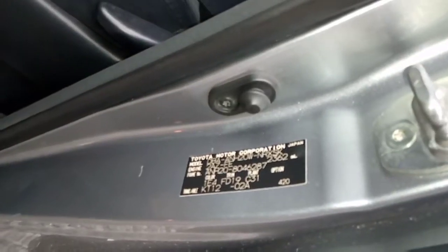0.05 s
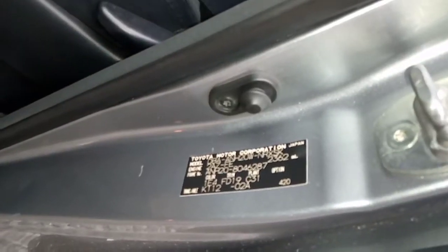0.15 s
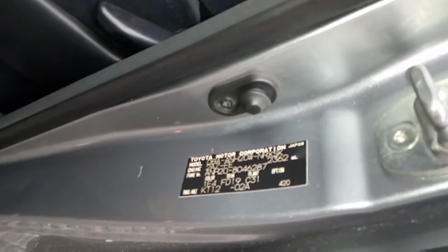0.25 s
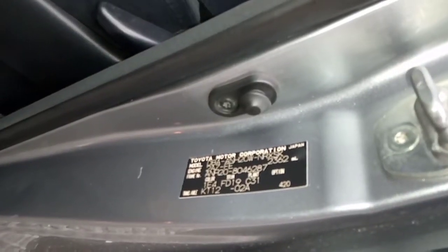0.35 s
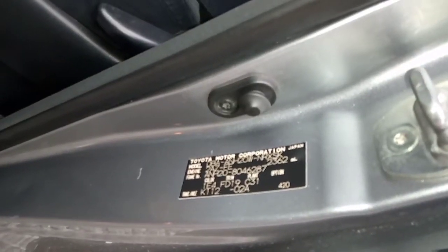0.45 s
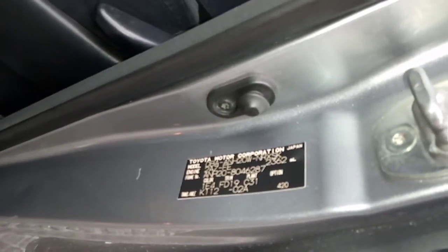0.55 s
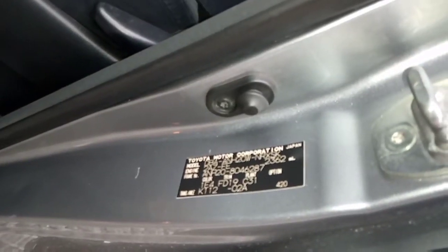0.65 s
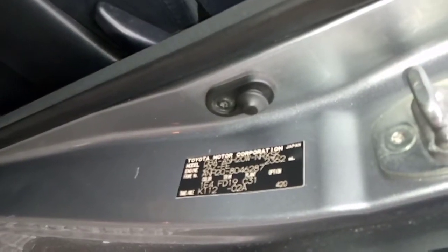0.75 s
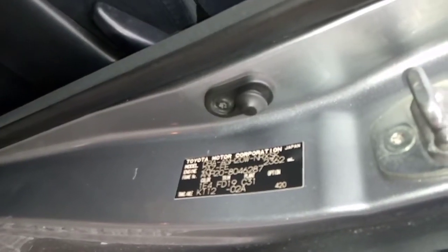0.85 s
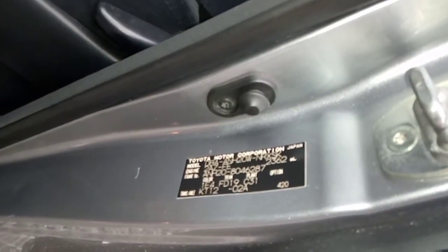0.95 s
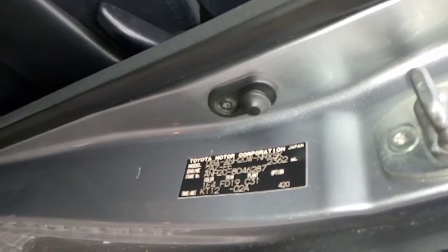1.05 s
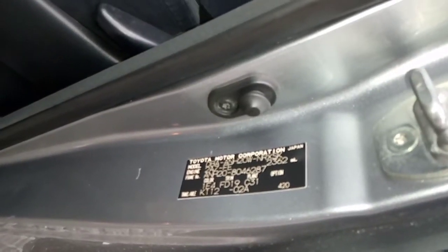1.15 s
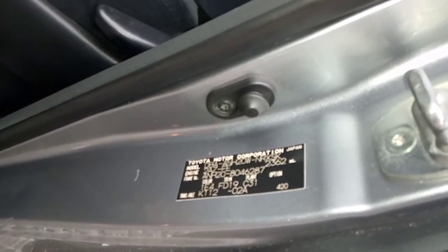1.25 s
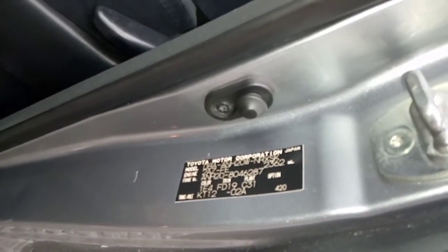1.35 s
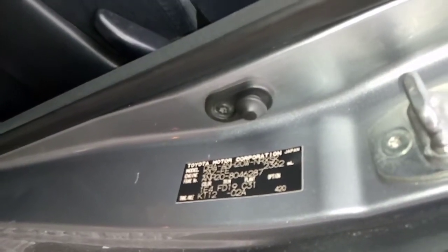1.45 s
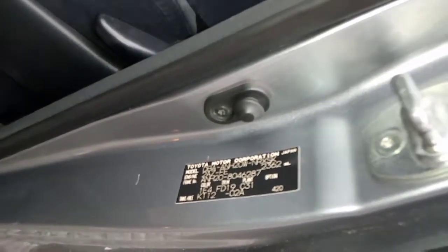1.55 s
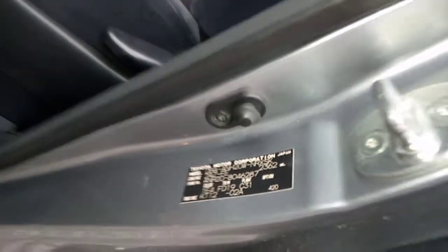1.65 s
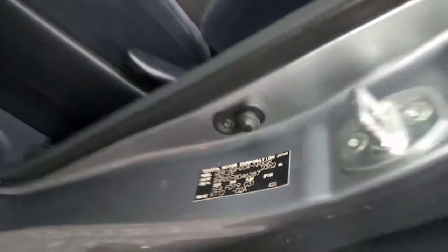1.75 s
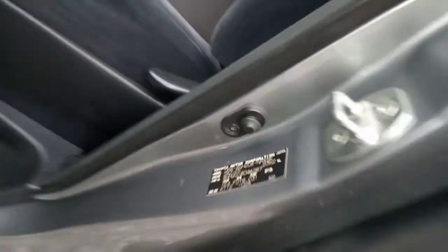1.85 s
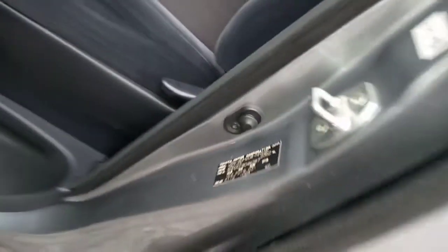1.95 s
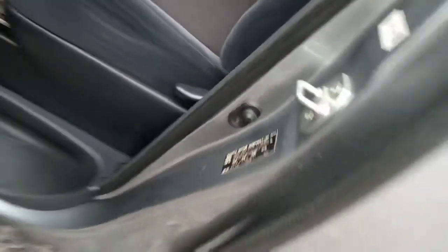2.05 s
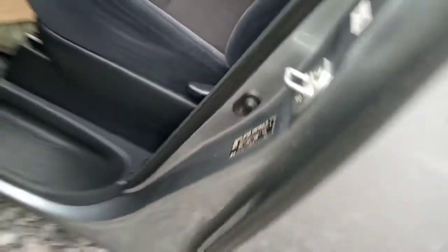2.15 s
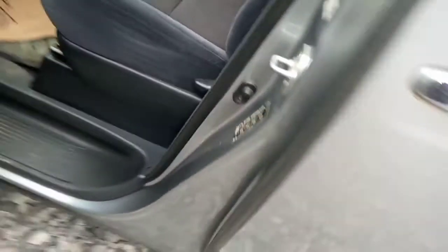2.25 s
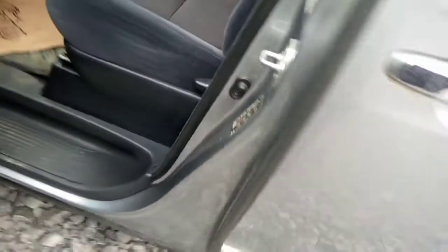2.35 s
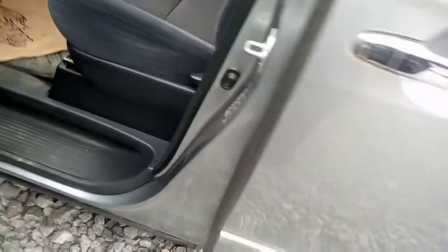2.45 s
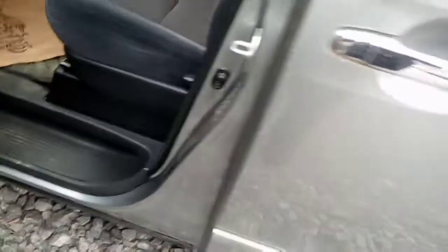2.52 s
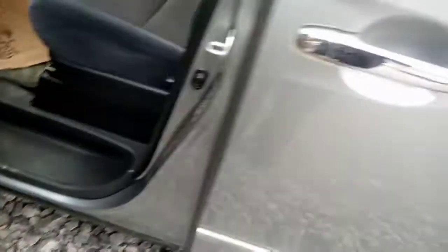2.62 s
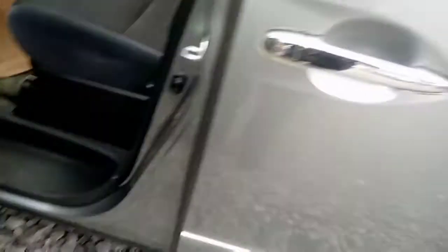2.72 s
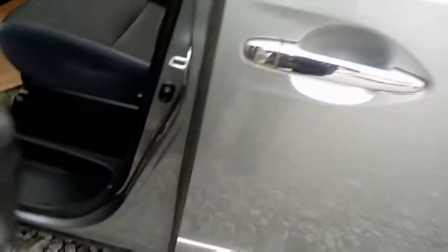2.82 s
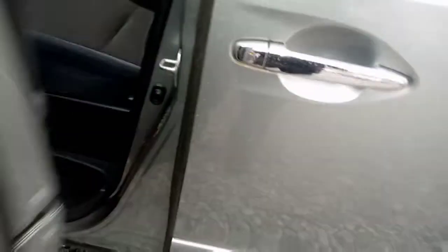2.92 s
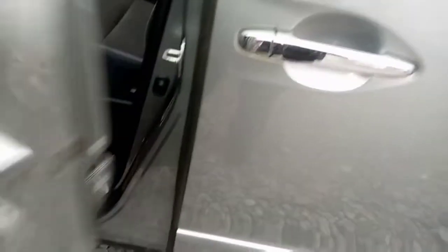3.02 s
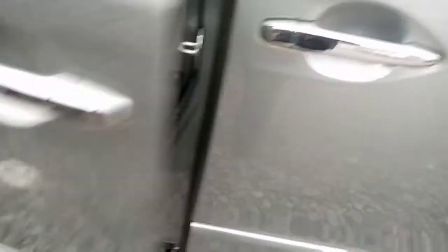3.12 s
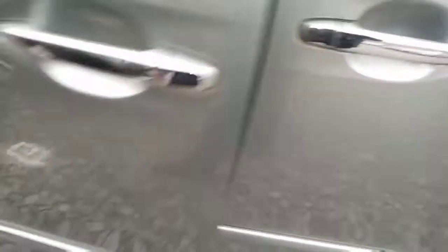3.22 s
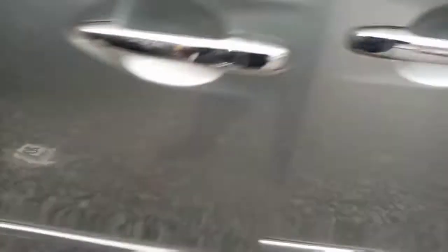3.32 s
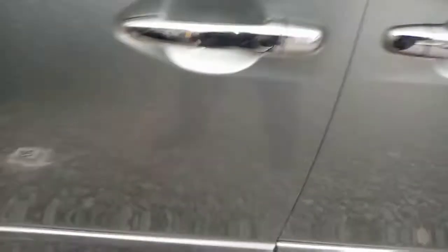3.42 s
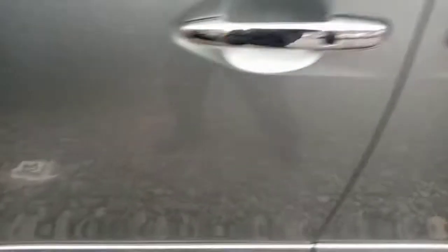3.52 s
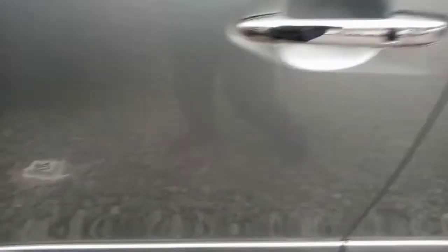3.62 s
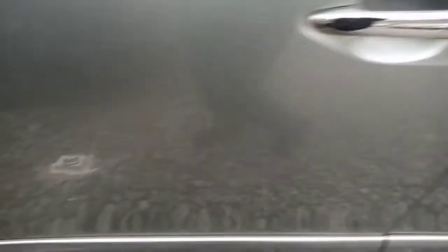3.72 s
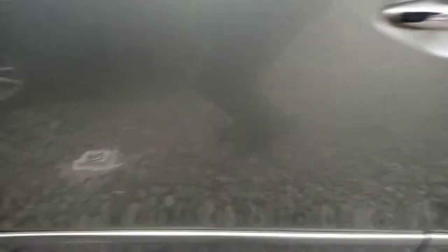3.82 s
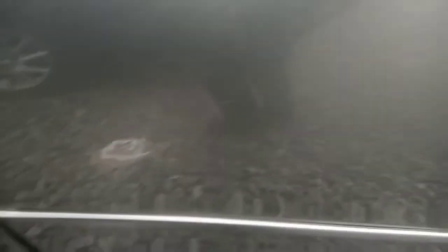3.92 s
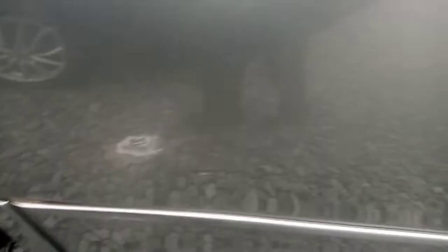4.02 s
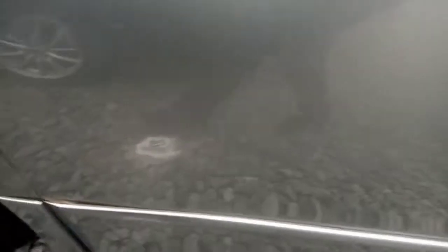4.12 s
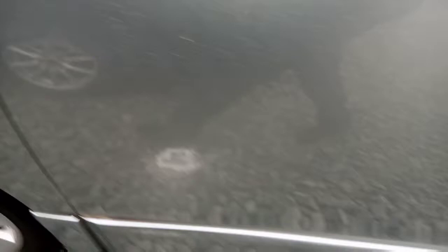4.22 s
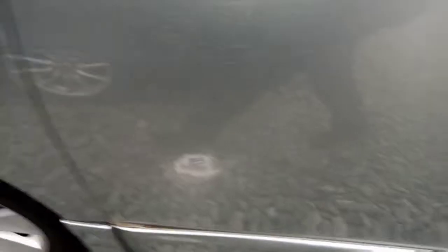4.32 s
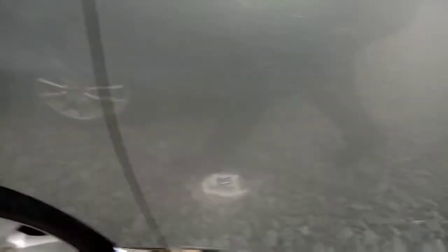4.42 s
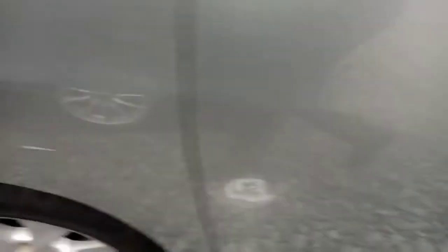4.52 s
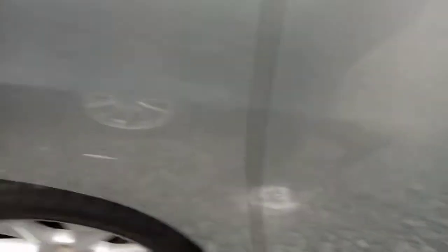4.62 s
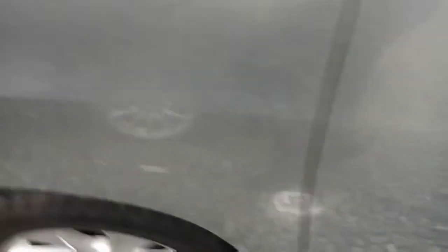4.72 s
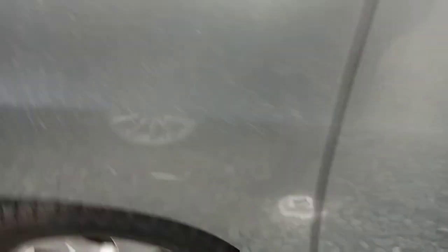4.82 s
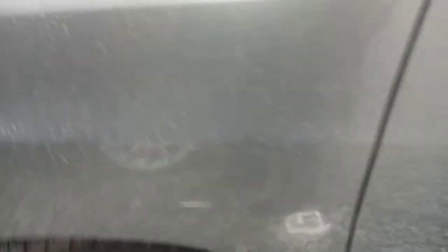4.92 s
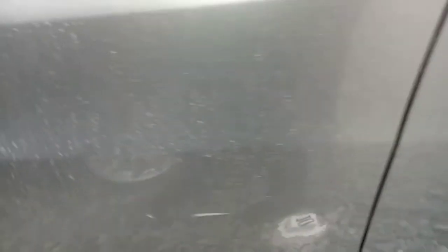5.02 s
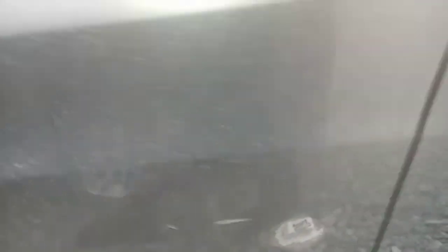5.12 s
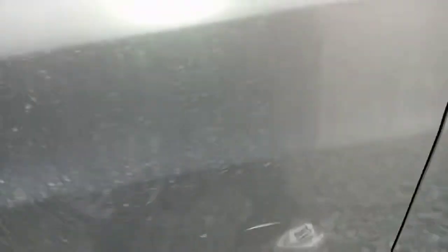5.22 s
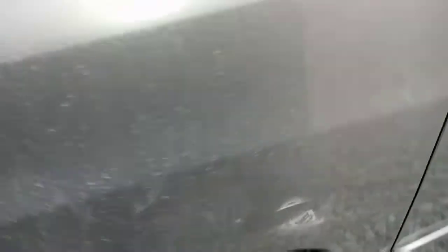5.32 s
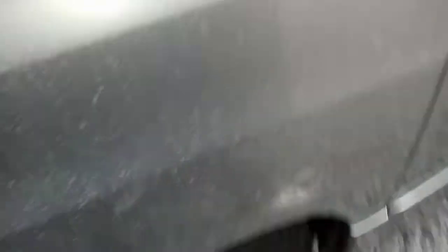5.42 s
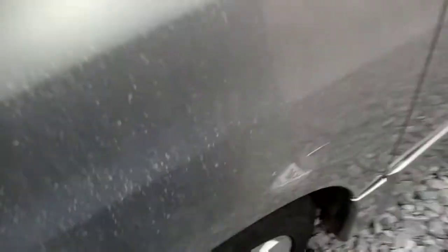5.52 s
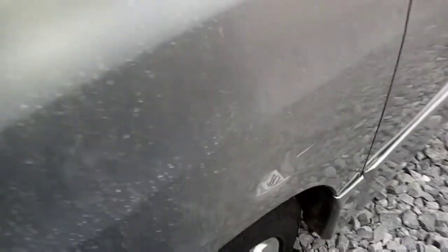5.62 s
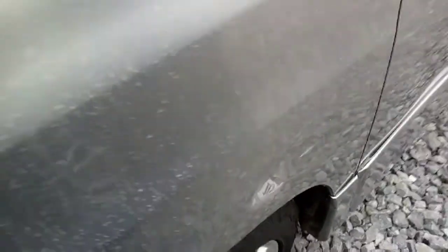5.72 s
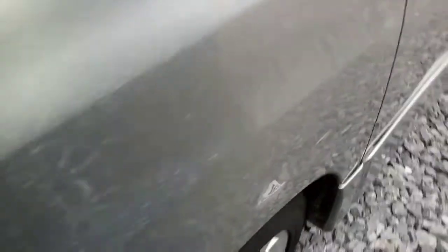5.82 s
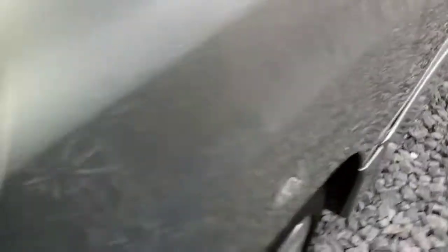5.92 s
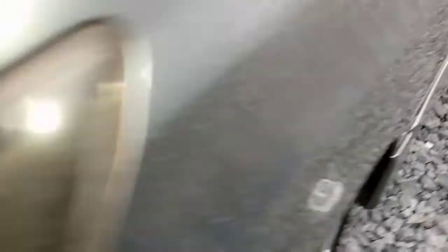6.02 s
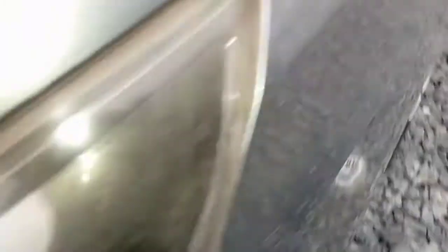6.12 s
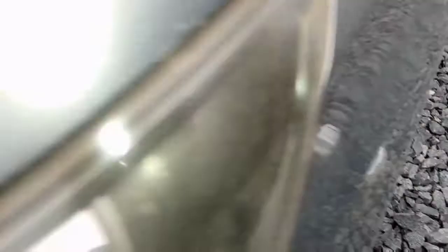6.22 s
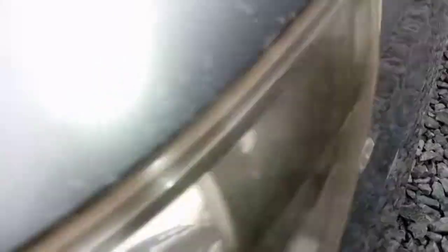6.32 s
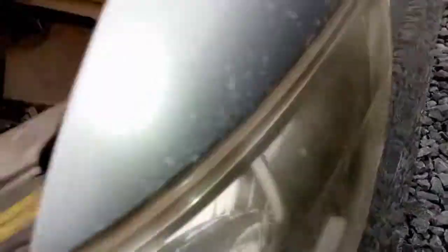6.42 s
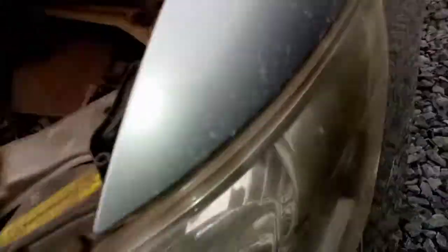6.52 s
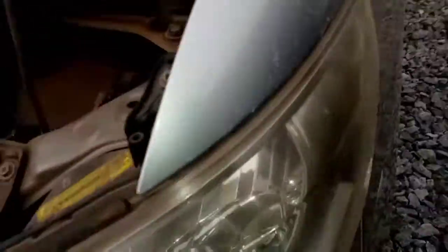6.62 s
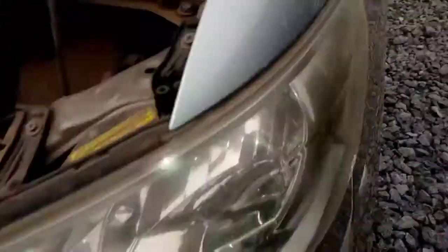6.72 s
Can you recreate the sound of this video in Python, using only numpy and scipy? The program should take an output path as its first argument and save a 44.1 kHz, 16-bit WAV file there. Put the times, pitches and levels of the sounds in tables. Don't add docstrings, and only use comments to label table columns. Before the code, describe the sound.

Faint, slightly robotic hum and hiss fill an open yard for a few seconds. Then one car door shuts near the microphone, a metallic latch tick running straight into a firm low-mid thump of panel, rubber seals and squeezed cabin air. Loose trim rattles briefly and the body settles softly. The quiet buzzing background continues to the end, nearly mono and dull in the highest treble.

```python
import sys
import numpy as np
from scipy import signal
from scipy.fft import rfft, irfft
from scipy.io import wavfile
from scipy.ndimage import uniform_filter1d

SR = 44100
rng = np.random.default_rng(int(sys.argv[2]) if len(sys.argv) > 2 else 0)


def file_out(sig):
    cols = np.atleast_2d(sig).T
    lim = np.clip(cols, -1, 1)
    pcm = np.round(lim * 32767).astype(np.int16)
    wavfile.write(sys.argv[1], SR, pcm)


def gain_from_decibels(decibels):
    exponent = np.asarray(decibels, float) / 20
    return 10 ** exponent


N = 298204
FRAME_HZ = 50

# t/s, peak level/dB
BLOWS = [(3.5130, -34.5), (3.5258, -47), (3.5367, -27), (3.5448, -28), (3.5510, -35), (3.5560, -36.5),
         (3.5642, -21.5), (3.5777, -33), (3.5850, -35), (3.5920, -23.5), (3.6010, -30.5), (3.6122, -29),
         (3.6298, -30), (3.6498, -42)]
# t/s, peak level/dB
LATCH = [
    (3.504, -50),
    (3.5070, -44),
    (3.5100, -42),
    (3.511, -26.5),
    (3.5098, -30),
    (3.5123, -33),
    (3.5160, -31),
    (3.5376, -29.5),
    (3.539, -38),
]


def rms_one(x):
    return x / np.sqrt(np.mean(x ** 2) + 1e-20)


def in_time(rows):
    s, *columns = np.transpose(rows)
    return [np.interp(np.arange(N) / SR, s, c) for c in columns]


def at_hz(points, hz):
    point_hz, point_db = np.transpose(points)
    return np.interp(np.log(hz + 1), np.log(point_hz), point_db)


def coloured(x, colour, low_hz, high_hz):
    hz = np.arange(N // 2 + 1) * SR / N + 1e-3
    band = 1 / np.sqrt((1 + (low_hz / hz) ** 6) * (1 + (hz / high_hz) ** 6))
    return rms_one(irfft(rfft(x) * band * gain_from_decibels(at_hz(colour, hz)), N))


def levelled(x, size, hold):
    power = uniform_filter1d(x ** 2, size=size)
    lumps = uniform_filter1d(power, size=size) + 1e-3
    return rms_one(x / lumps ** (hold / 2))


def drift(hz):
    r = np.exp(-2 * np.pi * hz / SR)
    return rms_one(signal.lfilter([1], [1, -2 * r, r * r], rng.standard_normal(N + SR))[SR:])


def low_cut(x, hz):
    return signal.sosfilt(signal.butter(2, hz, "high", fs=SR, output="sos"), x)


def struck(hits, modes, soft_hz, spread_db):
    at = [round(s * SR) for s, db in hits]
    hit_db = np.array(hits)[:, 1]
    chance = rng.standard_normal((len(hits), len(modes)))
    out = np.zeros(N)
    for k, (hz, level_db, t60_s) in enumerate(modes):
        clicks = np.full(N, 1e-18)
        clicks[at] = -gain_from_decibels(hit_db + level_db + spread_db * chance[:, k])
        r, w = 10 ** (-3 / (t60_s * SR)), 2 * np.pi * hz / SR
        out += signal.lfilter([0, np.sin(w)], [1, -2 * r * np.cos(w), r * r], clicks)
    return signal.sosfilt(signal.butter(2, soft_hz, fs=SR, output="sos"), out)


def glide(rows, turn_rad):
    hz, db = in_time(rows)
    start_s, start_hz, _ = rows[0]
    t = np.arange(N) / SR
    on = np.clip((t - start_s) / .006 + 1, 0, 1) * (t < rows[-1][0])
    cycles = np.cumsum(hz) / SR - start_s * start_hz
    return np.sqrt(2) * gain_from_decibels(db) * on * np.sin(2 * np.pi * cycles + turn_rad)


def thud():
    # f/Hz, level/dB, t60/s
    panel = [(152, -22, 0.08), (223, -20, 0.24), (246.5, -20, 0.35), (292, 0, 0.068), (330, -7, 0.011),
             (352, -5, 0.11), (389, -16, 0.12), (464, -11.5, 0.18), (520, -8.5, 0.056), (599, -4.5, 0.059),
             (640, -1.5, 0.059), (724, -17, 0.062), (910, -27, 0.045), (1050, -28, 0.061)]
    return gain_from_decibels(-13.5) * struck(BLOWS, panel, soft_hz=1500, spread_db=3.5)


def shove():
    # f/Hz, level/dB, t60/s
    push = [(300, -11.5, 0.0077), (520, -14, 0.0076)]
    return gain_from_decibels(-7.0) * struck(BLOWS, push, soft_hz=1100, spread_db=-5.0)


def latch():
    # f/Hz, level/dB, t60/s
    latch_modes = [(450, 8, 0.02), (1500, -26, .008), (2304, -24, 0.009), (2670, 1, 0.023),
                   (3120, -21, 0.0062), (3840, -11, 0.007), (4810, 3, 0.018), (5900, -8, .006)]
    return gain_from_decibels(-22.0) * struck(LATCH, latch_modes, soft_hz=5200, spread_db=-5.5)


def catch():
    # t/s, peak level/dB
    drops = [
        (3.5343, -33.5),
        (3.5360, -42.5),
    ]
    # f/Hz, level/dB, t60/s
    catch_ring = [(678, -4, 0.062), (2610, -12, .01)]
    return -struck(drops, catch_ring, soft_hz=4000, spread_db=-1.5)


def grains(per_s, spread_db):
    return (rng.random(N) < per_s / SR) * rng.standard_normal(N) * gain_from_decibels(spread_db * rng.standard_normal(N))


def shudder():
    # f/Hz, level/dB per Hz
    shudder_colour = [(24, -42), (40, -7), (105, -6), (148, 2), (178, 0.5), (226, -4.5), (427, -9),
                      (663, -14.5), (1310, -24.5), (4180, -34.5), (6350, -40.5), (7560, -62.5), (9830, -74),
                      (16600, -120)]
    # peak level/dB, swell/dB per s, t60/s, wash level/dB, wash t60/s
    shudder_bands = [
        (-50, 101, 0.34, -48.5, 1.85),
        (-44, 91, .5, -52, 2.1),
        (-50, 67, 0.424, -55.5, 1.9),
        (-52, -29, 0.37, -67, 0.73),
    ]
    band_jolt_db = [-17, -17, -36, -12.5]
    lead_in_s, touch_s, seated_s = 3.497, 3.5100, 3.59
    lead_in_db, lead_in_db_per_s = -7, 700
    jolt_t60_s, jolt_over_db = 0.024, -30

    t = np.arange(N) / SR
    after_s = np.maximum(t - seated_s, 0)
    swell_s = np.clip(t - seated_s, touch_s - seated_s, 0)
    lead_db = (lead_in_db + lead_in_db_per_s * (t - touch_s)) * (t < touch_s)
    jolts = np.zeros(N)
    for s, db in LATCH:
        if db > jolt_over_db:
            jolts += (t > s) * gain_from_decibels(2 * db - 120 * np.abs(t - s) / jolt_t60_s)

    contacts = grains(20000, spread_db=0.0)
    edges_hz = [30, 300, 900, 2500, 8300]
    out = np.zeros(N)
    for band, jolt_db, low_hz, high_hz in zip(shudder_bands, band_jolt_db, edges_hz, edges_hz[1:]):
        db, swell_db_per_s, t60_s, wash_db, wash_t60_s = band
        body = gain_from_decibels(db + swell_db_per_s * swell_s - 60 * after_s / t60_s + lead_db)
        wash = gain_from_decibels(wash_db - 60 * after_s / wash_t60_s + lead_db)
        power = body ** 2 + wash ** 2 + gain_from_decibels(2 * jolt_db) * jolts
        stir = uniform_filter1d(np.sqrt(power), size=60)
        out += stir * levelled(coloured(contacts, shudder_colour, low_hz, high_hz), size=500, hold=.8)
    return (t > lead_in_s) * out


def cabin():
    # t/s, f/Hz, level/dB rms
    cabin_air = [
        (3.508, 133.5, -53),
        (3.525, 169.6, -39.5),
        (3.55, 144, -39),
        (3.58, 146.8, -33.5),
        (3.6, 146.3, -47),
        (3.615, 178.9, -41.5),
        (3.64, 145.2, -40.5),
        (3.68, 155, -54),
        (3.85, 150, -64),
    ]
    # t/s, f/Hz, level/dB rms
    skin = [
        (3.53, 264.3, -41),
        (3.548, 207.9, -42.5),
        (3.564, 217.8, -32),
        (3.578, 271.4, -45.5),
        (3.596, 237.2, -28),
        (3.612, 190, -40),
        (3.63, 236.4, -39.5),
        (3.66, 250, -45),
        (3.86, 235, -63),
    ]
    return glide(cabin_air, -.1) + glide(skin, 4.59)


def rocking():
    # t/s, peak level/dB
    settling = [
        (3.787, -48),
        (3.885, -49),
    ]
    # f/Hz, level/dB, t60/s
    body_modes = [(150, -15, 0.095), (242, 8, 0.2)]
    return gain_from_decibels(-5.0) * struck(settling, body_modes, soft_hz=300, spread_db=2.0)


def floor_pan():
    # f/Hz, level/dB, t60/s
    pan_modes = [(48, -6, 0.23), (87, 5, 0.28)]
    # t/s, peak level/dB
    heaves = [
        (3.512, -59),
        (3.87, -70),
    ]
    slam = struck([(3.565, -54), (3.6, -49)], pan_modes, soft_hz=90, spread_db=2)
    return slam + struck(heaves, pan_modes, soft_hz=90, spread_db=-1)


def loose_clip():
    # t/s, peak level/dB
    clip_rings = [
        (3.750, -73),
        (3.757, -71),
        (3.870, -70),
        (3.878, -74),
    ]
    # f/Hz, level/dB, t60/s
    clip_mode = [(5750, 0, .06)]
    return struck(clip_rings, clip_mode, soft_hz=9000, spread_db=-4)


def pulse_phases(size):
    spectrum = rfft((rng.random(size) < .04) * rng.choice([-1, 1], size))
    return spectrum / np.abs(spectrum + 1e-12)


def evenest(levels, size):
    octave = np.log2(np.arange(len(levels)) / 7 + 1e-9) // 1 == np.arange(5)[:, None]
    tries = [np.repeat(pulse_phases(size // 2), 2)[:len(levels)] * levels for _ in range(300)]
    power = np.abs(rfft(irfft(np.array(tries)[:, None] * octave, size) ** 2))
    throb = power[:, 1:, 2:10:2] / power[:, 1:, :1] / [1, 1.2, 1.6, 1.6]
    return tries[np.argmin(np.sum(throb ** 2, axis=(1, 2)))]


def buzz(low_db, high_db):
    # multiple of the frame rate, level/dB rms
    buzz_lines = [(1, -87), (2, -80), (3, -73), (4, -84), (5, -76), (6, -74), (7, -78), (8, -79), (9, -73),
                  (10, -71), (11, -82), (12, -78), (13, -87), (14, -71), (15, -82), (16, -80), (17, -92),
                  (18, -83), (19, -90), (20, -75), (21, -82), (22, -87), (23, -80), (24, -77), (25, -80),
                  (26, -86), (27, -84), (28, -79), (29, -90), (30, -82),
                  (31, -82), (32, -84), (33, -87), (35, -88), (36, -82), (37, -86), (38, -80), (39, -90),
                 (40, -90), (41, -81), (42, -87), (43, -83), (44, -86), (45, -84), (46, -84), (48, -86),
                 (49, -85), (50, -84), (51, -85), (53, -91), (54, -84), (59, -91), (60, -81), (61, -85),
                 (62, -87), (64, -85), (65, -88), (66, -86), (67, -88), (68, -85), (69, -86), (72, -86),
                 (73, -82), (74, -84), (75, -85), (76, -87), (79, -87), (80, -90), (83, -80), (88, -84),
                 (89, -86), (90, -89), (93, -85), (96, -84), (97, -86), (98, -83), (99, -89), (101, -84),
                 (110, -91), (111, -90), (113, -88), (114, -84), (115, -92), (116, -91), (118, -83),
                 (121, -93), (122, -90), (124, -94),
                  (125, -96), (127, -99), (129, -94), (130, -94), (131, -93), (132, -98), (133, -99),
                (135, -98), (136, -102), (137, -98), (140, -100), (141, -102), (142, -104), (143, -98),
                (144, -97), (151, -106), (152, -107), (154, -105), (157, -110), (158, -110), (159, -108),
                (160, -105), (161, -108), (162, -112), (163, -112), (166, -110), (168, -113), (169, -113),
                (174, -118), (176, -112), (177, -113), (179, -120), (180, -119), (183, -120), (185, -122),
                (187, -124), (188, -126), (189, -121), (190, -124), (191, -125)]
    # f/Hz, level/dB rms a line
    buzz_rest = [(300, -84), (1867, -87), (2598, -92), (3570, -91), (4834, -94), (5932, -94.5),
                 (6811, -101), (7733, -110), (8968, -122)]
    rest_db, flip_rel_db, flip_dull_db_per_octave = -1, -5.5, -6

    size = 2 * SR // FRAME_HZ
    hz = np.arange(size // 2 + 1) * FRAME_HZ / 2
    scale = (hz > 0) * (hz < 9700) * size / np.sqrt(2)
    line_db = at_hz(buzz_rest, hz) + np.clip(10.0 * rng.standard_normal(len(hz)), -9, 3.5)
    flip_db = line_db + flip_rel_db + np.minimum(0, 12 * np.log2((hz + 1) / 300))
    flip_db += flip_dull_db_per_octave * np.maximum(0, np.log2((hz + 1) / 4500))
    line_db += rest_db
    for multiple, db in buzz_lines:
        line_db[2 * round(multiple)] = db

    odd = np.arange(len(hz)) % 2
    lines = evenest(gain_from_decibels(line_db) * scale * (1 - odd), size)
    low = np.resize(irfft(lines * (hz < 990), size), N)
    high = np.resize(irfft(lines * (hz >= 990), size), N)
    turn_rad = np.cumsum(drift(1.437)) * 8.83 / SR
    flips = np.zeros(N)
    for weight in (np.cos(turn_rad), np.sin(turn_rad)):
        pattern = irfft(pulse_phases(size) * gain_from_decibels(flip_db) * scale * odd, size)
        flips += weight * np.resize(pattern, N)
    return gain_from_decibels(low_db) * low + gain_from_decibels(high_db) * (high + flips)


def yard_noise(rumble_db, hiss_db):
    # f/Hz, level/dB per Hz
    yard_colour = [(60, -23.5), (130, -8.5), (230, 3), (330, -6.5), (460, -3.5), (580, -11), (700, -6.5),
                   (860, -9), (2200, -10), (5100, -14.5), (5750, -16.5), (6700, -22), (7700, -34.5),
                   (9400, -43.5)]
    places = rng.exponential(1, SR // FRAME_HZ) ** 0.97
    places = np.resize(uniform_filter1d(places, size=7, mode="wrap"), N)
    grain = rms_one(np.sqrt(places)) * rng.standard_normal(N)
    hiss = levelled(coloured(grain, yard_colour, 375, 8300), size=700, hold=0.52)
    rumble = levelled(coloured(rng.standard_normal(N), yard_colour, 20, 375), size=700, hold=.3)
    return gain_from_decibels(rumble_db - 3.0) * rumble + gain_from_decibels(hiss_db - 3.5) * hiss


def yard():
    # t/s, level/dB, share of power repeating each frame/0-1, far traffic level/dB
    yard_curve = [(0, 0.5, 0.45, -61.5), (.4, 0.5, 0.29, -65), (.7, 0.5, 0.79, -65), (1.25, 1, 0.4, -62.5),
                  (1.65, 1, 0.69, -66.5), (2.2, 1.9, 0.33, -62.5), (2.55, 1.36, 0.36, -66.5),
                  (3.1, 1.55, 0.24, -65), (3.45, -0.5, 0.18, -67), (3.7, 2, 0.04, -65.5),
                  (4.05, 0.95, 0.45, -62.5), (4.6, -0.2, 0.64, -64.5), (5.05, -1, 0.38, -66.5),
                  (5.35, -1.5, 0.51, -67.5), (5.75, -2.5, 0.53, -70), (6.15, -1.5, 0.51, -63),
                  (6.4, -1.5, 0.42, -68.5), (6.76, -1.5, 0.38, -67.5)]
    level_db, share, traffic_db = in_time(yard_curve)
    share = np.clip(share, .02, .98)
    repeat_db, fresh_db = 10 * np.log10(share), 10 * np.log10(1 - share)
    lines = buzz(1.94 + level_db + 0.44 * repeat_db, 3.5 + level_db + repeat_db)
    whole = lines + yard_noise(traffic_db, -58.5 + level_db + fresh_db)
    dull = signal.sosfiltfilt(signal.butter(2, 3520, fs=SR, output="sos"), whole)
    return dull + gain_from_decibels(-0.55 + .35 * level_db) * (whole - dull)


def scene():
    mic_low_hz = 123
    door = low_cut(latch() + thud() + rocking() + shudder(), mic_low_hz)
    door = door + low_cut(shove() + catch(), mic_low_hz / 2)
    mono = door + cabin() + floor_pan() + loose_clip() + yard()
    return np.stack([mono, mono])


def roll_off(x):
    return signal.sosfilt(signal.butter(12, 9800, fs=SR, output="sos"), x)


def record(dry):
    mono = dry[0]
    wobble = signal.lfilter([.15], [1, -.85], rng.standard_normal(N))
    wobble = wobble * gain_from_decibels(7.0 * np.clip(drift(12.0), -1.5, 1))
    held = mono / (1 + np.sqrt(uniform_filter1d(mono ** 2, size=800) + 1e-12) / 0.0019)
    unlike = gain_from_decibels(-6.5) * (wobble - .02) * held + gain_from_decibels(-20) * np.roll(held, 300)
    unlike = unlike + gain_from_decibels(-34) * np.roll(mono, 300)
    unlike = signal.sosfilt(signal.butter(4, [70, 5600], "band", fs=SR, output="sos"), unlike)
    converter_offset = .00131
    return roll_off(dry + unlike * np.array([[1], [-1]]) + converter_offset)


dry = scene()
out = record(dry)
file_out(out)
```